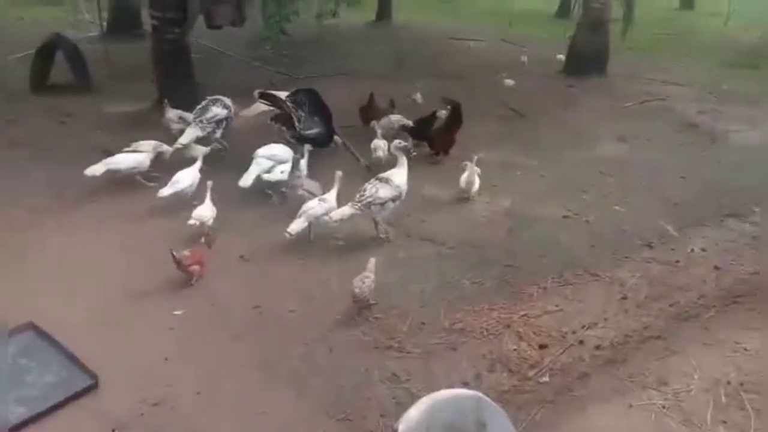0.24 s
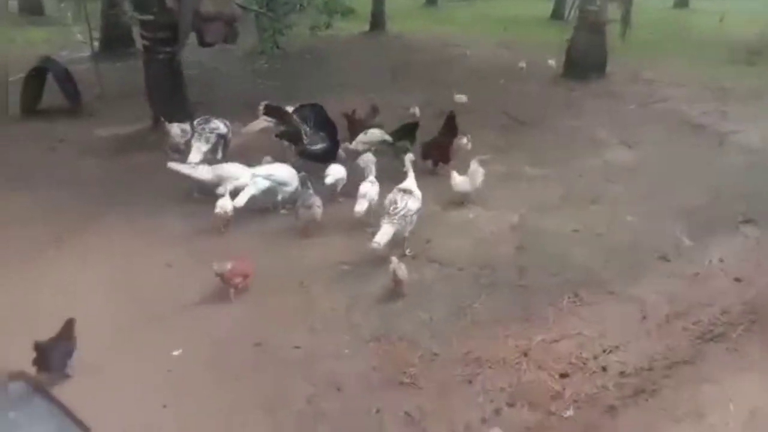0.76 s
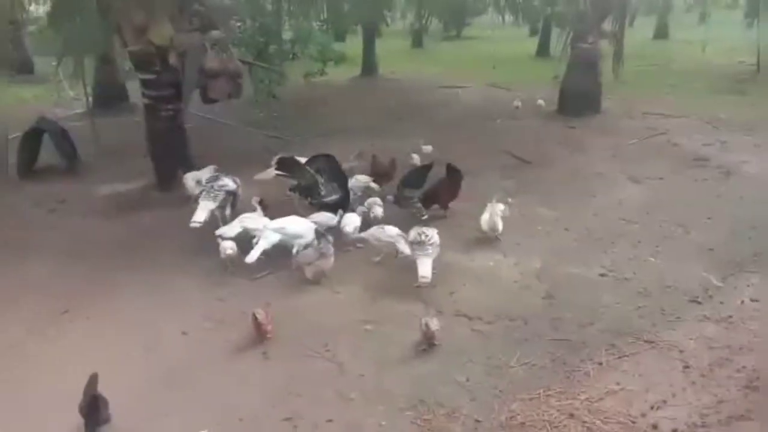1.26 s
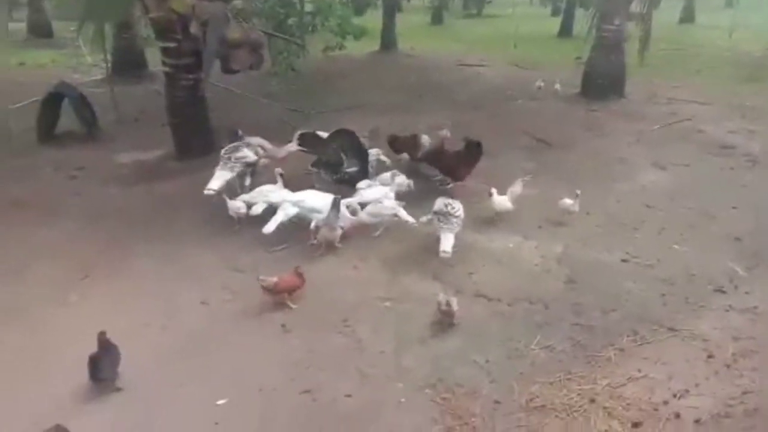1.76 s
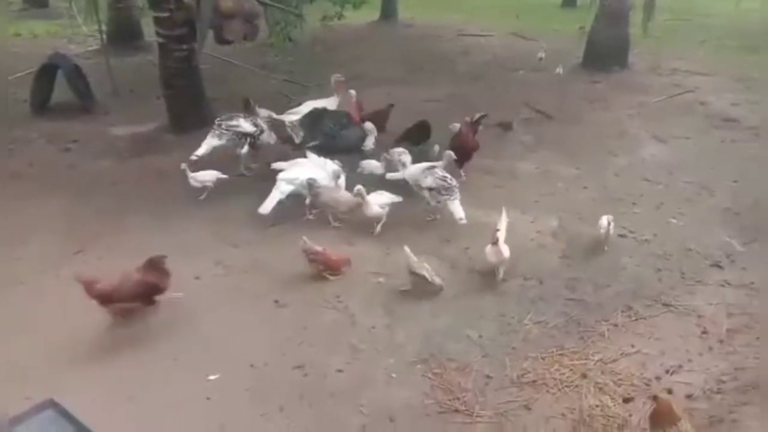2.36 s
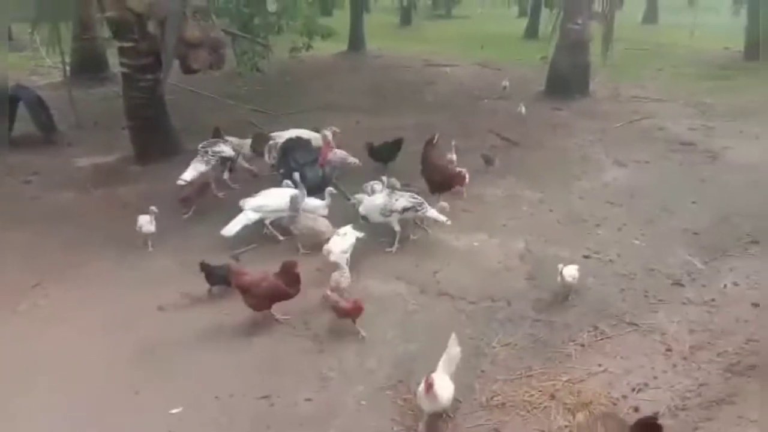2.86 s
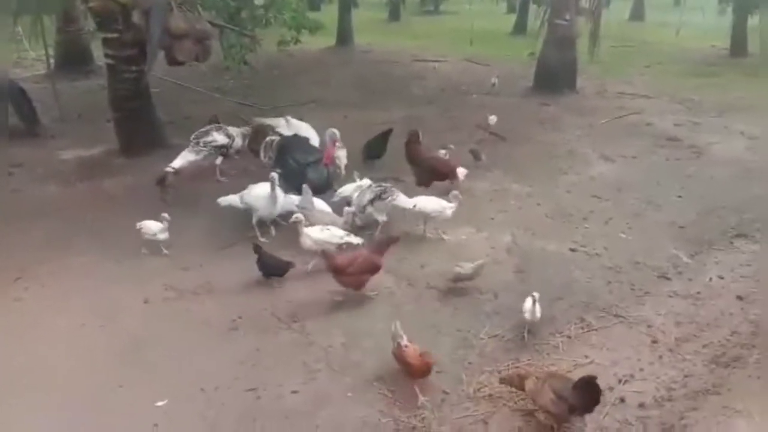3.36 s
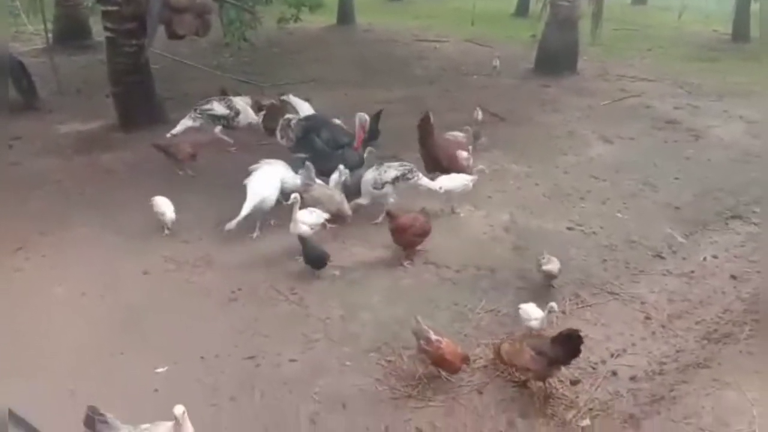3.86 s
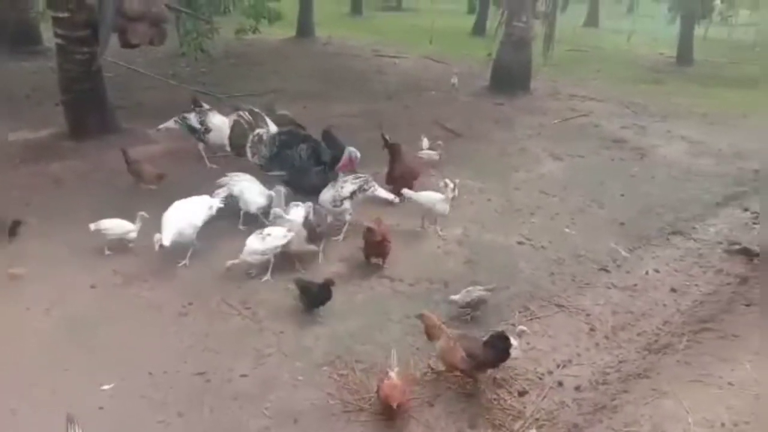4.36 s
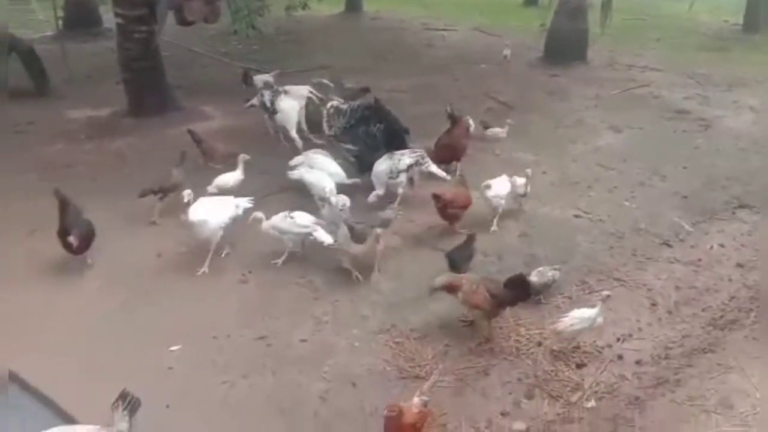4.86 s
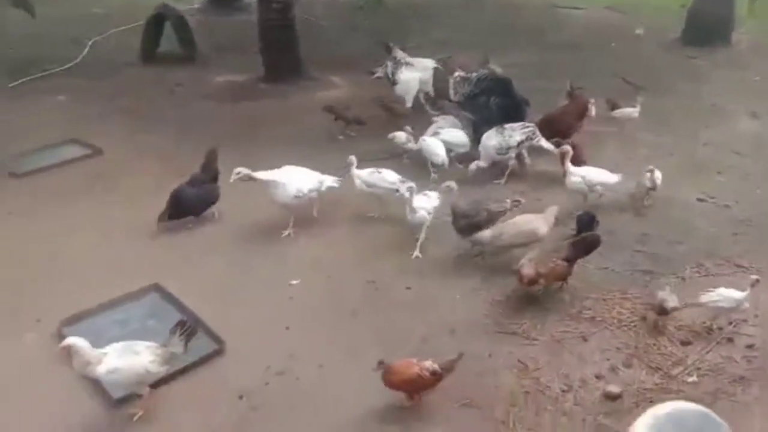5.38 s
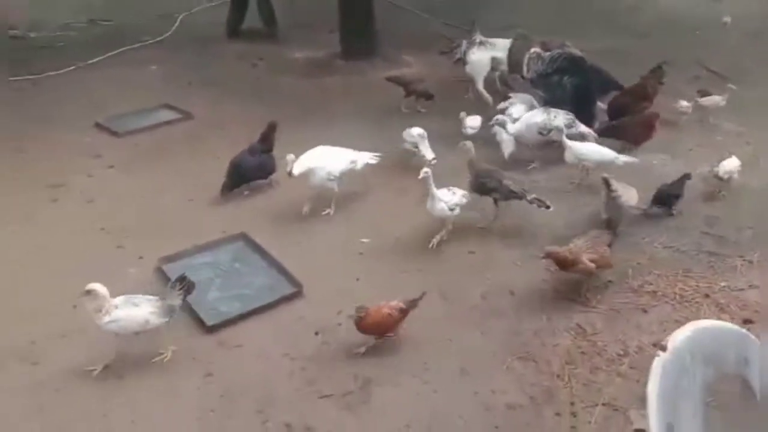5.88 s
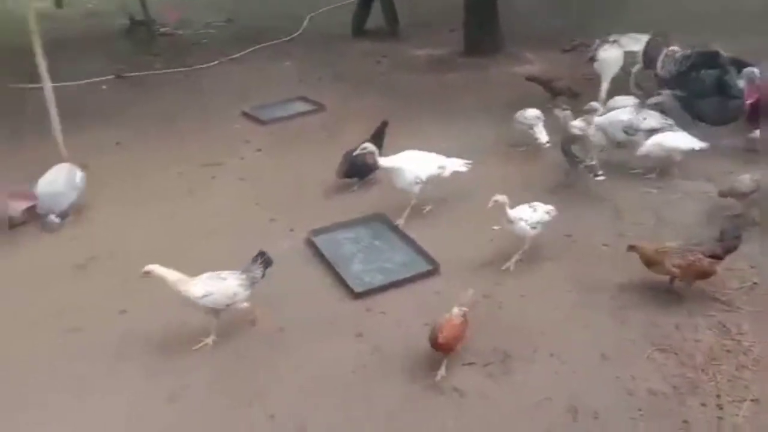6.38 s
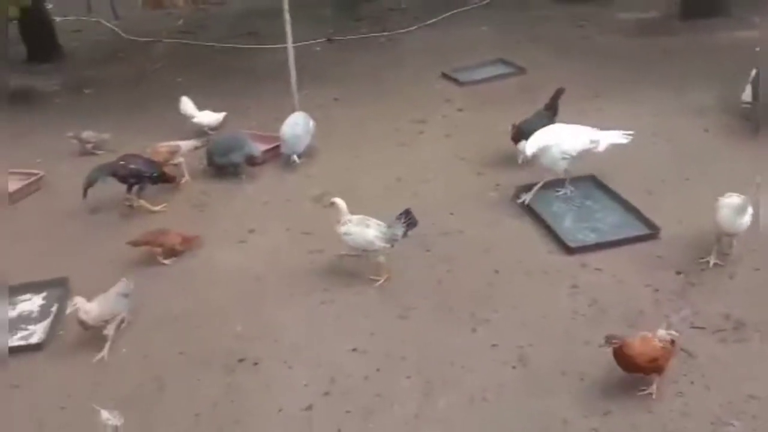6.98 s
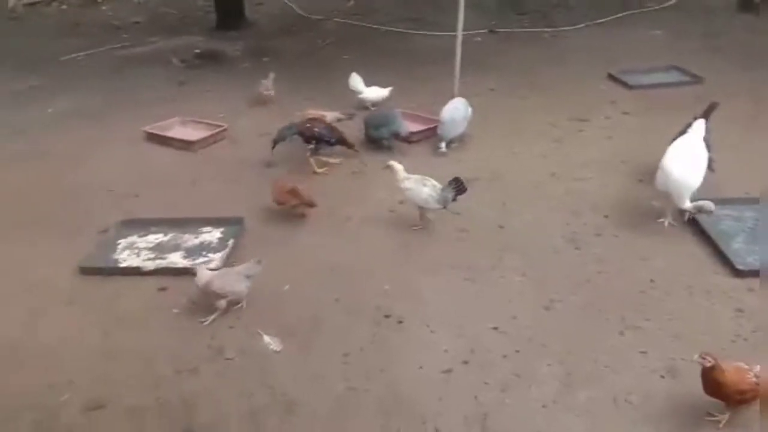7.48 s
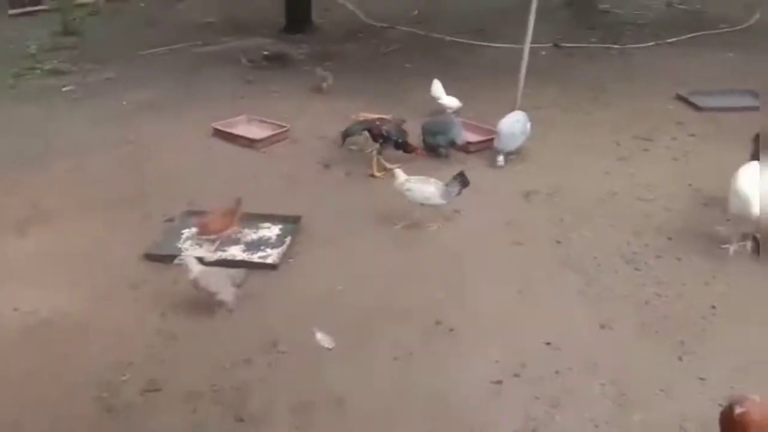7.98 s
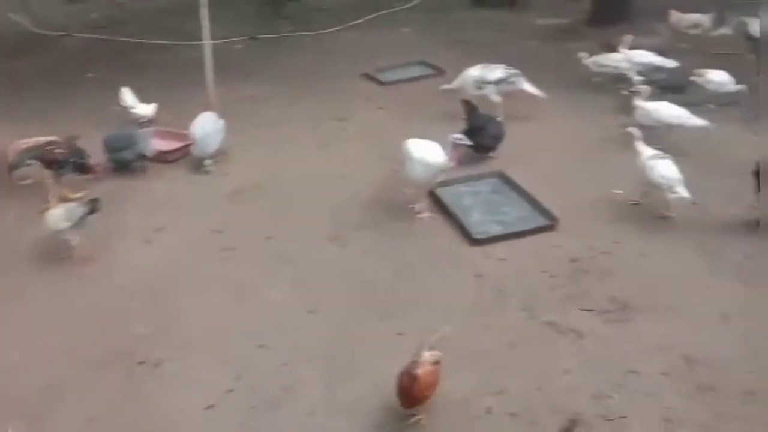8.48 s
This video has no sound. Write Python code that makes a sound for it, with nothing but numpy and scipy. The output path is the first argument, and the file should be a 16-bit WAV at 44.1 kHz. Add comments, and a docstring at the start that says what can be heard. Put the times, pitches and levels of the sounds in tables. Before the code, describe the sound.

A mixed flock of young turkeys and hens peeps, chirps and clucks in an open farm yard over steady high insect drone.

```python
"""A low hum swells briefly, perhaps a strutting tom's drumming, while a mixed flock feeds in a farm yard under trees.
Young turkeys peep and chirp in thin, gliding near-sines; hens cluck in pulses and gated air shaped by throat
resonances, and one draws out a long rising note. Insects drone in the trees throughout, as shaped noise over a
distant rumble; feet and wings scratch in grainy noise. Echoes off the yard smear the calls."""
import sys
import numpy as np
from scipy import signal
from scipy.fft import rfft, irfft, next_fast_len
from scipy.io import wavfile
from scipy.ndimage import map_coordinates

SR = 44100
rng = np.random.default_rng(int(sys.argv[2]) if len(sys.argv) > 2 else 0)


def put_to_file(sound):
    """Save the sound as 16-bit audio at rate SR, in the file named by the first command-line argument."""
    columns = np.atleast_2d(sound).T  # one column per channel
    safe = np.clip(columns, -1, 1)
    whole_steps = np.round(safe * 32767)
    wavfile.write(sys.argv[1], SR, whole_steps.astype(np.int16))


N = 384993

# Activity at the back of the flock. Each row: time in seconds, level in dB before each layer's own gain.
YARD_ACTIVITY = [(0, -27), (.78, -39), (1.29, -46.5), (1.6, -38.5), (2.04, -37.5), (2.19, -33.5),
                 (2.77, -40), (3.4, -40.5), (4.65, -36), (4.9, -40), (5.4, -43), (5.9, -45), (6.55, -53),
                 (7.3, -47), (7.8, -45.5), (7.98, -33), (8.15, -41), (8.73, -59)]


def from_db(db):
    """Decibels to gain."""
    return 10 ** (np.asarray(db) / 20)


def rms_one(x):
    """Scale to unit power."""
    return x / np.sqrt(np.mean(x ** 2) + 1e-20)


def in_time(rows):
    """Interpolate each column of a curve at every sample; the first column is seconds."""
    s, *columns = np.transpose(rows)
    t = np.arange(N) / SR
    return [np.interp(t, s, column) for column in columns]


def colour(x, spectrum):
    """Shape a signal by (Hz, dB) points, interpolated over log frequency."""
    hz, db = np.transpose(spectrum)
    bins_hz = np.maximum(np.fft.rfftfreq(len(x), 1 / SR), 1)
    gain = from_db(np.interp(np.log(bins_hz), np.log(hz), db))
    return irfft(rfft(x) * gain, len(x))


def noise(spectrum):
    """Coloured noise of unit power."""
    white = rng.standard_normal(next_fast_len(N))
    return rms_one(colour(white, spectrum)[:N])


def drift(rate_hz, size):
    """Smooth random wander of spread about 1, through `rate_hz` random knots a second."""
    knots = rng.standard_normal(4096)
    return map_coordinates(knots, [np.arange(size) * rate_hz / SR], order=2, mode="wrap")


def add(out, s, sound):
    """Mix a sound in at time s."""
    at = int(s * SR)
    out[at:at + len(sound)] += sound[:max(N - at, 0)]


def turn(hz):
    """Phase of a moving pitch."""
    return 2 * np.pi * np.cumsum(hz) / SR


def swell(length_s, loudest, fullness):
    """One push of air of unit power: rises to its loudest point (share of its length) and dies."""
    u = np.linspace(0, 1, int(length_s * SR))
    arch = np.sin(np.pi * np.interp(u, [0, loudest, 1], [0, .5, 1]))
    return rms_one(np.abs(arch) ** fullness)


def arc(hz, glide, arch=0):
    """Start, middle and end pitch of a note that glides and bows."""
    return hz * (1 + glide * np.array([-.5, 0, .5]) - arch * np.array([1, 0, 1]))


def hum(hum_hz=55.0, waver=0.008, unsteady=0.34, dulling=0.12):
    """A loose low tone swells and fades; each partial wanders on its own and the upper ones die first."""
    # Each row: time in seconds, level in dB.
    hum_level = [(0, -37), (.08, -36.5), (.27, -33), (.45, -37), (.56, -41.5), (.65, -37.5), (.8, -47.5),
                 (1.0, -49.5), (1.5, -51), (2.2, -52)]
    # Each row: multiple of hum_hz, relative level in dB.
    hum_partials = [(2, -1), (3, -11), (4, 1.5), (5, 0.5), (6, -6), (7, -7), (8, -2), (9, -7.5), (10, -10)]
    db, = in_time(hum_level)
    sunk_db = db - db.max()
    out = np.zeros(N)
    for k, partial_db in hum_partials:
        # dulling: extra dB lost per partial for each dB that the hum sinks
        gain = from_db(partial_db + dulling * (k - 0.5) * sunk_db)
        gain = gain * np.exp(unsteady * drift(11, N))
        phase = turn(k * hum_hz * (1 + waver * drift(30, N)))
        out += gain * np.sin(phase + rng.uniform(0, 2 * np.pi))
    power = np.sum(from_db([partial_db for k, partial_db in hum_partials]) ** 2) / 2
    return from_db(db) * out / np.sqrt(power)


def rumble(gain_db=-0.5, lump_db=2.0):
    """Distant rumble: low noise with a lumpy level."""
    # Each row: time in seconds, level in dB before gain_db.
    rumble_level = [(0, -42), (.8, -43), (1.5, -46), (3, -46.5), (4, -50.5), (5.1, -47.5), (6, -48),
                    (7.3, -51.5), (8.2, -49), (8.73, -56)]
    # Each row: frequency in Hz, relative density in dB per Hz.
    rumble_spectrum = [(20, -13), (40, -20), (65, 5), (110, 7.5), (180, 3.5), (260, -9.5), (400, -10),
                       (800, -12.5), (2000, -32)]
    db = in_time(rumble_level)[0] + gain_db + lump_db * drift(17, N)
    return from_db(db) * noise(rumble_spectrum)


def far_flock_blur(gain_db=-13.5, surge_db=4.0):
    """Far birds blur into shaped noise that surges with the yard's activity."""
    # Each row: frequency in Hz, relative density in dB per Hz.
    flock_spectrum = [(300, 6.5), (500, 9), (1000, 17), (1700, 17.5), (2700, 11), (3700, 16.5), (5200, 9.5),
                      (7000, -37), (13000, -45)]
    db = in_time(YARD_ACTIVITY)[0] + gain_db + surge_db * drift(18, N)
    return from_db(db) * noise(flock_spectrum)


def insects(level_db=-33.0, throb_db=1.28):
    """Insect chorus: throbbing high noise, spread in stereo through the trees by an independent side signal."""
    # Each row: frequency in Hz, relative density in dB per Hz.
    insect_spectrum = [(4500, -30), (5700, -19.5), (6400, -7), (7100, -2.5), (7850, 2), (8400, -2),
                       (8900, -5.5), (9300, -15), (10000, -21), (11000, -30.5), (13000, -40)]
    # Each row: frequency in Hz, side minus mid in dB.
    insect_width = [(4500, -27.5), (6000, -4), (7000, -2), (8000, -20.5), (9500, -4.5), (12000, -8)]
    mid = noise(insect_spectrum)
    side = colour(noise(insect_spectrum), insect_width)
    stereo = mid + side * np.array([[1], [-1]])
    return from_db(level_db + throb_db * drift(90, N)) * stereo


def scratches(grain_db=-1.0, top_db=-32, upper_db=-8):
    """Short grainy hisses with a steep lower edge, as of feet and wings brushing the ground."""
    # Each row: start in seconds, length in seconds, lower edge in Hz, level in dB.
    strokes = [(0.02, 0.16, 734, -42), (0.698, 0.037, 1310, -42), (6.623, 0.0095, 777, -36),
               (8.222, 0.47, 1380, -44)]
    out = np.zeros(N)
    for s, length_s, edge_hz, db in strokes:
        stroke = swell(length_s, .25, fullness=.35)
        n = len(stroke)
        grit = rng.standard_normal(n) * from_db(grain_db * drift(600, n))
        spectrum = [(edge_hz * 0.84, -25), (edge_hz, 0), (4300, upper_db), (12000, top_db)]
        add(out, s, from_db(db) * stroke * rms_one(colour(grit, spectrum)))
    return out


def whistle(length_s, arc_hz, loudest, partials_db, rough, scoop=0.0, waver=0.0032, rasp=0.041, flutter=0.41,
            rasp_rate_hz=420, trill_hz=135, fullness=0.5):
    """A near-sine from the syrinx on a pitch arc; when forced, its pitch and strength flutter."""
    push = swell(length_s, loudest, fullness)
    n = len(push)
    u = np.linspace(0, 1, n)
    hz = np.polyval(np.polyfit([0, .5, 1], arc_hz, 2), u)
    # pitch climbs into the note while the pressure builds
    hz = hz * (1 - scoop * np.exp(-u / 0.0927))
    phase = turn(hz * (1 + waver * drift(94.5, n) + rough * rasp * drift(rasp_rate_hz, n)))
    tone = sum(from_db(db) * np.sin(k * phase) for k, db in enumerate(partials_db, 1))
    # a forced note throbs in uneven beats
    beats = np.sin(turn(trill_hz * (1 + 0.28 * drift(60.0, n))))
    beats = beats + 2.16 * drift(rasp_rate_hz, n)
    return np.sqrt(2) * push * tone * (1 + rough * flutter * beats)


def peep(length_s, arc_hz, db, octave_db, rough, loudest=0.56, third_db=-12, fourth_db=-33, scoop=0.0323):
    """A young turkey's note: fundamental, octave and a trace of higher partials."""
    weaker_db = min(db, octave_db)
    partials_db = [db, octave_db, weaker_db + third_db, weaker_db + fourth_db]
    return whistle(length_s, arc_hz, loudest, partials_db, rough, scoop=scoop)


def scattered(sound, share, t60_s=0.13):
    """Part of a call's power goes round bodies and trunks and arrives blurred, with a short tail."""
    t = np.arange(int(.25 * SR)) / SR
    paths = rng.standard_normal(len(t)) * from_db(-60 * t / t60_s)
    paths *= np.sqrt(share / np.sum(paths ** 2))
    paths[0] = np.sqrt(1 - share)  # direct sound
    return signal.fftconvolve(sound, paths)


def held_peeps(strand_ratio=1.05, strand_share=0.11):
    """Poults' held peeps; in a hoarse one the other side of the syrinx beats against the first."""
    # Each row: start in seconds, length in seconds, pitch in Hz, glide and arch as shares of the pitch,
    # level in dB before the poults' gain, roughness 0-1, octave against the fundamental in dB.
    peep_notes = [(.025, .16, 2793, 0.035, 0.075, -42, 0.33, -18),
                  (.16, .14, 2188, 0.028, -0.01, -40.5, .08, -7),
                  (.329, 0.13, 2797, 0.055, -0.0028, -45.5, 0.2, -7),
                  (.49, 0.14, 2103, -0.15, -0.12, -45.5, 0.48, -18),
                  (.605, 0.13, 2751, 0.0021, -0.022, -39.5, 0.26, -10.5),
                  (.915, 0.15, 2900, -0.016, 0.073, -45.5, 0.41, -8),
                  (.95, 0.055, 2530, 0.078, 0, -55, .6, -20),
                  (1.243, 0.094, 2812, 0.024, -0.0076, -44.5, 0.24, -4.5),
                  (1.319, .059, 2997, 0.019, 0.034, -44, 0.26, -9),
                  (1.365, 0.1, 2640, 0, -.027, -55.5, 0.64, -5),
                  (1.519, .1, 2944, 0.11, 0.042, -44.5, .5, -8),
                  (1.565, 0.11, 2783, -0.013, 0.067, -41, 0.3, -7),
                  (1.616, 0.091, 1880, -0.11, -.063, -44.5, .39, -18),
                  (1.768, 0.084, 3073, -0.051, 0.012, -34, 0.2, -13),
                  (1.822, 0.14, 2770, 0.014, 0.0074, -34, 0.39, -10.5),
                  (2.067, .13, 2822, 0.058, -0.019, -31.5, 0.21, -12),
                  (2.359, .11, 2890, -0.093, 0.026, -27.5, 0.23, -13),
                  (2.543, 0.089, 2746, 0.14, 0.11, -32, 0.17, -18.5),
                  (2.643, 0.096, 2950, -0.086, -0.013, -26, 0.13, -13),
                  (2.948, .16, 3064, -0.025, 0.0033, -33.5, 0.021, -10.5),
                  (3.354, .12, 2560, -0.1, 0.014, -37.5, 0.18, -7),
                  (3.676, .12, 2467, -0.2, -0.07, -43.5, 0.19, -9),
                  (3.81, 0.054, 1900, 0.035, -0.0073, -46, 0.23, -4),
                  (3.875, 0.061, 1944, 0.029, -0.027, -33, 0.18, -14),
                  (3.991, 0.18, 2612, -0.0059, 0.041, -41, 0.2, -15),
                  (4.075, 0.066, 2142, 0.14, -0.055, -39, 0.38, -7.5),
                  (4.116, 0.086, 2734, -.083, -.03, -33.5, 0.58, -25),
                  (4.198, 0.066, 2484, -0.047, 0.012, -34.5, 0.3, -26),
                  (4.322, 0.063, 2706, -0.013, -0.011, -34.5, 0.23, -21),
                  (4.393, 0.071, 2732, 0.0029, 0.016, -30.5, 0.16, -18),
                  (4.43, 0.23, 2835, -0.019, .01, -38, 0.72, -22),
                  (4.44, 0.087, 2526, -0.019, -.015, -43, 0.16, 1),
                  (4.549, .059, 2606, -.08, -0.046, -38.5, .48, -17),
                  (4.668, 0.053, 2780, 0.037, 0.022, -31.5, 0.17, -23),
                  (4.7, 0.101, 2762, .03, 0, -30.5, 0.19, -22),
                  (4.79, 0.12, 2942, -0.073, 0.095, -26, 0.41, -25.5),
                  (5.045, 0.072, 3010, 0.07, 0.092, -28, 0.19, -24),
                  (5.099, 0.11, 2714, -0.043, 0.021, -34, 0.17, -17),
                  (5.385, 0.028, 2504, -0.17, -.094, -38.5, .25, -9),
                  (5.423, 0.041, 2787, 0.027, 0.085, -32, 0.39, -24),
                  (5.451, 0.06, 2506, -0.18, -0.02, -32.5, 0.27, -20),
                  (5.86, 0.084, 2386, -0.17, 0.002, -38.5, 0.65, -21),
                  (6.465, 0.043, 2730, 0.12, 0.018, -49, .3, -20),
                  (7.075, 0.05, 2980, 0.031, 0.14, -43.5, 0.59, -8),
                  (7.23, 0.073, 2777, -.024, .024, -50, 0.23, -17),
                  (7.314, 0.1, 2373, 0.022, -.044, -39, .2, -5.5),
                  (7.42, 0.018, 3000, .095, .035, -45, .4, -17),
                  (7.495, 0.12, 3290, -.27, -0.0013, -45.5, 0.17, -20),
                  (7.63, 0.089, 2602, -.14, 0.0057, -40, 0.38, -18),
                  (7.7, 0.082, 2840, 0.11, 0.088, -45, 0.49, -8.5),
                  (7.9, .07, 2240, -0.122, 0.0034, -41.5, 0.42, -25),
                  (7.959, .12, 2930, -0.0087, 0, -49, 0.63, -18),
                  (8.1, 0.21, 3110, 0.016, -0.0099, -51, 0.63, -20)]
    # A quiet, distant bird arrives more scattered. Each row: level in dB, scattered share of the power.
    peep_scatter = [(-44, 0.34), (-39.5, 0.015)]
    out = np.zeros(N)
    for s, length_s, hz, glide, arch, db, rough, octave_db in peep_notes:
        note = peep(length_s, arc(hz, glide, arch), db, db + octave_db, rough)
        strand = whistle(length_s, arc(strand_ratio * hz, glide), 0.52, [db], rough)
        share = np.interp(db, *np.transpose(peep_scatter))
        add(out, s, scattered(note + strand_share * rough * strand, share))
    return out


def yelps(fundamental_db=-10, rough=0.33, loudest=0.66):
    """Poults' yelps slide down and sound mostly in their octave."""
    # Each row: start in seconds, length in seconds, pitch in Hz, glide as a share of the pitch,
    # octave level in dB before the poults' gain.
    yelp_notes = [(1.62, 0.072, 2264, -0.27, -48.5), (1.666, 0.058, 1985, -0.025, -43.5),
                  (1.856, 0.092, 2143, -0.2, -35.5), (2.202, 0.092, 2060, -0.29, -40.5),
                  (2.728, .11, 2505, -0.087, -43.5), (3.062, 0.093, 2470, -0.16, -38),
                  (5.491, 0.042, 1880, -0.071, -45.5), (7.913, 0.079, 2065, -0.21, -33),
                  (8.185, 0.092, 2040, -0.258, -34), (8.669, 0.051, 2142, -0.099, -36)]
    out = np.zeros(N)
    for s, length_s, hz, glide, octave_db in yelp_notes:
        add(out, s, peep(length_s, arc(hz, glide), octave_db + fundamental_db, octave_db, rough, loudest))
    return out


def climbing_whistles(length_s=0.1326, glide=0.004, arch=0.011, rough=0.058, scoop=0.083, loudest=0.73):
    """Poults' whistles climb to a held pitch, mostly strongest in the octave."""
    # Each row: start in seconds, pitch in Hz, octave and fundamental levels in dB before the poults' gain.
    whistle_notes = [(3.07, 2110, -41, -74), (6.04, 2187, -50.5, -48), (6.346, 2345, -38.5, -48.5),
                     (6.648, 2323, -41, -42), (6.949, 2420, -39, -46.5)]
    out = np.zeros(N)
    for s, hz, octave_db, db in whistle_notes:
        add(out, s, peep(length_s, arc(hz, glide, arch), db, octave_db, rough, loudest, scoop=scoop))
    return out


def poults(gain_db=3.5):
    """Young turkeys: peeps, yelps and whistles from the syrinx under one gain."""
    return from_db(gain_db) * (held_peeps() + yelps() + climbing_whistles())


def chirps(gain_db=-2, loudest=0.33, arch=0.038, octave_db=-24, rough=0.23, twin_ratio=1.09, twin_db=-13):
    """Quick slides in which both sides of the syrinx sound."""
    # Each row: start in seconds, length in seconds, pitch in Hz, glide as a share of the pitch,
    # level in dB before gain_db.
    chirp_notes = [(0.127, 0.026, 3300, 0.01, -42), (0.735, 0.041, 2690, -0.47, -41),
                   (1.444, 0.046, 2290, -.35, -40), (1.598, 0.087, 2486, -0.26, -38),
                   (1.678, 0.042, 2116, 0.16, -37), (1.873, 0.035, 3190, 0.05, -37),
                   (2.075, 0.02, 2330, -0.41, -47), (2.137, .062, 2618, -0.27, -25.5),
                   (2.164, 0.058, 2910, 0.24, -26.5), (2.354, 0.038, 2050, -0.83, -34.5),
                   (2.44, 0.063, 3013, 0.16, -28), (2.6, 0.061, 2370, -0.57, -35),
                   (2.729, 0.041, 3194, 0.25, -23.5), (2.73, 0.034, 2420, -0.35, -35),
                   (2.785, 0.044, 2560, -.6, -34), (3.178, 0.036, 2950, -0.68, -24),
                   (4.887, 0.05, 2520, -0.18, -36.5), (5.16, .025, 2330, -.25, -52),
                   (5.217, 0.033, 2210, -0.19, -39), (5.352, 0.083, 2730, -1, -36.5),
                   (5.803, 0.0346, 2520, -0.25, -44.5), (6.295, 0.038, 2655, -0.14, -42),
                   (6.564, 0.046, 2420, -0.5, -45), (7.299, 0.052, 2520, 0.013, -39),
                   (7.365, 0.085, 2570, -0.63, -46), (7.612, 0.055, 2415, -0.41, -41.5)]
    out = np.zeros(N)
    for s, length_s, hz, glide, db in chirp_notes:
        main = whistle(length_s, arc(hz, glide, arch), loudest, [db, db + octave_db], rough)
        twin = whistle(length_s, arc(twin_ratio * hz, glide, arch), loudest, [db + twin_db], rough)
        add(out, s, from_db(gain_db) * (main + twin))
    return out


def whines(loudest=0.41, octave_db=-14, third_db=-19, rough=0.26):
    """Older birds whine below the pitch of the young, with an octave and a third partial."""
    # Each row: start in seconds, length in seconds, pitch in Hz, glide as a share of the pitch, level in dB.
    whine_notes = [(0.243, 0.19, 1153, 0.14, -44), (0.41, 0.027, 1058, -0.5, -35.5),
                   (.425, 0.044, 1333, -0.13, -43), (0.476, 0.059, 1033, -0.23, -40.5),
                   (1.76, 0.13, 1217, -0.16, -36), (1.875, 0.11, 987, 0.037, -33),
                   (2.101, 0.038, 1635, 0.13, -33), (3.271, 0.12, 824, -0.35, -49.5),
                   (3.473, 0.084, 1150, -0.38, -46), (4.428, 0.043, 1116, -0.24, -47.5),
                   (4.497, 0.094, 1018, -0.45, -42.5), (4.689, 0.02, 1403, -0.65, -40),
                   (4.604, 0.08, 702, -0.2, -52), (4.801, 0.045, 1180, -0.14, -38),
                   (4.843, 0.026, 880, -0.34, -41), (6.011, 0.16, 1106, 0.046, -44.5),
                   (6.01, 0.15, 1298, -0.074, -44), (7.137, 0.04, 1353, -0.045, -32.5),
                   (7.448, 0.15, 1477, 0.2, -45), (8.1, .12, 1534, 0.077, -50.5),
                   (8.298, 0.075, 1665, -0.03, -46.5)]
    out = np.zeros(N)
    for s, length_s, hz, glide, db in whine_notes:
        partials_db = [db, db + octave_db, db + third_db]
        add(out, s, whistle(length_s, arc(hz, glide), loudest, partials_db, rough))
    return out


def slurs(bend=2.2, loudest=0.42, octave_db=-26, rough=0.18):
    """Single clean notes hang on their top pitch, then drop ever faster."""
    # Each row: start in seconds, length in seconds, top pitch in Hz, fall as a share of the pitch, level in dB.
    slur_notes = [(0.41, 0.065, 3720, 0.23, -55), (3.492, 0.11, 3580, 0.64, -45),
                  (3.815, 0.11, 3830, .01, -48), (3.847, 0.14, 3530, 0.49, -42),
                  (5.003, 0.065, 3960, 0.31, -50), (5.114, 0.086, 3760, 0.21, -41.5),
                  (5.321, 0.051, 3990, 0.18, -45), (5.384, 0.09, 3540, 0.13, -40.5),
                  (5.755, .075, 3980, .3, -55), (5.875, 0.062, 3530, 0.144, -37.5),
                  (6.096, 0.11, 3580, 0.3, -35.5), (6.46, 0.1, 3670, 0.22, -42),
                  (6.672, 0.087, 3620, 0.35, -49), (6.716, 0.099, 3610, 0.37, -36),
                  (7.115, 0.067, 3660, 0.037, -45), (7.284, 0.07, 3470, 0.11, -48),
                  (7.443, 0.067, 4500, 0.28, -46), (7.825, 0.115, 3525, 0.36, -44.5),
                  (7.88, .05, 4000, .15, -49), (8.445, 0.12, 3350, 0.23, -45)]
    out = np.zeros(N)
    for s, length_s, top_hz, fall, db in slur_notes:
        arc_hz = top_hz * (1 - fall * np.array([0, .5, 1]) ** bend)
        add(out, s, whistle(length_s, arc_hz, loudest, [db, db + octave_db], rough))
    return out


def cluck(length_s, hz, throat_hz, rough, jitter=0.0554, breath=1.0, shimmer=0.72, rattle=0.96, rattle_hz=94.5,
          arch=0.101, loudest=0.223, bass_db=-38, low_db=-20, below_db=-11, skirt_db=-5, skirt=1.14,
          above_db=-13, top_db=-42, chest_hz=496, chest_db=3):
    """Uneven pulses and air gated by each cycle pass through the throat and chest resonances."""
    # Clear squawks rise, rough clucks fall. Each row: roughness, glide as a share of the pitch.
    cluck_glides = [(.3, 0.19), (.42, -.07), (.8, -.25)]
    # A low cluck is made with the beak shut, which muffles its top. Each row: throat resonance in Hz, muffling in dB.
    beak_muffle = [(600, -8), (900, -3)]
    push = swell(length_s, loudest, fullness=0.64)
    n = len(push)
    glide = np.interp(rough, *np.transpose(cluck_glides))
    # pitch rises with the pressure and stumbles when the voice is rough
    bend = glide * np.linspace(-.5, .5, n) + arch * (push - 1)
    phase = turn(hz * (1 + bend + rough * jitter * drift(302.2, n)))
    lags = rng.uniform(0, np.pi, 12)
    pulses = rms_one(sum(np.cos(k * phase + lag) for k, lag in enumerate(lags, 1)))
    air = rng.standard_normal(n) * (1 + np.cos(phase))
    # a rough voice closes and opens at about rattle_hz
    rattling = np.sin(turn(rattle_hz * (1 + 0.264 * drift(61.5, n))))
    grain = shimmer * drift(159.0, n) + rattle * rattling
    voice = (pulses + breath * rough * air) * (1 + rough * grain)
    muffle_db = np.interp(throat_hz, *np.transpose(beak_muffle))
    throat = [(130, bass_db), (220, low_db), (throat_hz / 2, below_db), (throat_hz / skirt, skirt_db),
              (throat_hz, 0), (throat_hz * skirt, skirt_db), (throat_hz * 2, above_db + muffle_db),
              (6000, top_db + muffle_db)]
    chest = [(chest_hz / skirt, 0), (chest_hz, chest_db), (chest_hz * skirt, 0)]
    return rms_one(push * colour(colour(voice, throat), chest))


def clucks():
    """The near hens cluck and squawk in throat-shaped pulses."""
    # Each row: start in seconds, length in seconds, pitch in Hz, throat resonance in Hz, level in dB, roughness.
    cluck_notes = [(0.418, 0.12, 579, 1010, -42, 0.59), (1.083, 0.062, 346, 490, -41.5, 0.58),
                   (2.13, 0.076, 388.6, 775, -44.5, 1.03), (2.374, 0.039, 530, 1550, -39.5, 0.76),
                   (2.491, 0.055, 432.5, 1040, -43.5, 1.08), (2.638, 0.4, 498, 1030, -46.5, 0.98),
                   (2.85, 0.11, 276, 905, -41.5, 0.54), (3.953, 0.02, 307, 990, -37, 0.8),
                   (4.275, 0.13, 281, 1010, -47, 0.39), (4.559, 0.063, 514, 950, -40, 0.63),
                   (4.617, 0.037, 326, 690, -43, 0.77), (4.712, 0.021, 375, 910, -34, 0.73),
                   (4.822, 0.02, 826, 1500, -31.5, 0.62), (4.86, 0.018, 401, 1120, -45, 0.7),
                   (5.015, 0.052, 337.6, 1090, -39, 0.38), (5.128, 0.051, 282, 1000, -43.5, 0.4),
                   (5.309, 0.085, 271.4, 920, -42.5, 0.7), (5.378, 0.068, 447, 744, -41.5, 0.1),
                   (5.45, 0.089, 520, 1120, -41.5, 0.36), (5.662, 0.046, 261.5, 750, -43, 0.79),
                   (5.759, 0.12, 369, 1320, -54.5, 0.37), (5.928, 0.2, 391, 1080, -42, 0.42),
                   (6.075, 0.092, 280, 640, -50, 0.4), (6.827, 0.027, 235.5, 1070, -39, 0.85),
                   (7.044, 0.049, 315.7, 1007, -40.5, 1.6), (7.333, 0.044, 265, 835, -44, 0.9),
                   (7.466, 0.19, 494, 1220, -45.5, 1), (7.723, 0.17, 202, 442, -51.5, 0.39),
                   (7.667, 0.45, 308, 1350, -48, 0.55), (7.94, 0.038, 357, 560, -43.5, 0.44),
                   (8.015, 0.23, 329, 1290, -49, 0.68), (8.135, 0.031, 284, 534, -43, 0.46),
                   (8.22, 0.0296, 207.6, 960, -40, 1.1)]
    out = np.zeros(N)
    for s, length_s, hz, throat_hz, db, rough in cluck_notes:
        add(out, s, from_db(db) * cluck(length_s, hz, throat_hz, rough))
    return out


def far_birds(count=120, start_s=1.3, end_s=7.6, level_db=-14, low_hz=1700, high_hz=3400, fall=0.199,
              octave_db=-9, rough=0.51, blur=0.86):
    """Birds at the back slip in soft, hoarse falling peeps, mostly scattered, that follow the yard's activity."""
    out = np.zeros(N)
    for k, (when, long, pitch, slide, loud) in enumerate(rng.random((count, 5))):
        hz = low_hz + (high_hz - low_hz) * pitch
        arc_hz = hz * (1 + fall * slide * np.array([.5, .1, -.5]))
        db = level_db + 3 * (2 * loud - 1)
        s = start_s + (end_s - start_s) * (k + when) / count
        add(out, s, whistle(0.031 + 0.13 * long, arc_hz, 0.05, [db, db + octave_db], rough))
    return scattered(out * from_db(in_time(YARD_ACTIVITY)[0]), blur)[:N]


def soft_clucks(count=14, start_s=2.3, end_s=8.1, length_s=0.1027, level_db=-52, hz=360, throat_hz=900,
                spread=0.54, rough=0.42):
    """Hens farther off mutter while they feed: soft clucks of random length, pitch and throat."""
    out = np.zeros(N)
    for k, (when, *chance) in enumerate(rng.random((count, 4))):
        long, pitch, throat = 1 + spread * (np.array(chance) - .5)
        s = start_s + (end_s - start_s) * (k + when) / count
        add(out, s, cluck(length_s * long, hz * pitch, throat_hz * throat, rough))
    return from_db(level_db) * out


def long_note(octave_rest_db=-48, push_octave_db=10, push_sag=0.074, upper_db=-21, waver=0.008, shimmer=0.034,
              quaver=0.0235, breakup=0.66, fullness=0.42):
    """A hen's slowly rising note sags with each push, and quavers and breaks up towards its end."""
    # Each row: time in seconds, pitch in Hz, fundamental level in dB.
    note_curve = [(6.077, 736, -48), (6.329, 827, -44.5), (6.72, 874.5, -40), (6.932, 888, -41),
                  (7.08, 975, -42), (7.3, 1047, -48), (7.48, 1003, -51)]
    # Pushes flatten the pitch and bring out the octave. Each row: start in seconds, length in seconds.
    pushes = [(6.386, 0.088), (6.469, 0.11), (6.556, 0.15), (6.726, .1), (6.931, 0.1), (7.189, 0.14),
              (7.365, 0.039), (7.41, 0.057)]
    hz, first_db = in_time(note_curve)
    start, end = note_curve[0][0], note_curve[-1][0]
    gate, strain = in_time([(start - .01, 0, 0), (start + 0.022, 1, 0), (end - .02, 1, 1), (end + .01, 0, 1)])
    effort = np.zeros(N)
    for s, length_s in pushes:
        push = swell(length_s, 0.42, fullness)
        add(effort, s, push / push.max())
    wander = waver * drift(120, N) + quaver * strain ** 2 * drift(45, N)
    phase = turn(hz * (1 - push_sag * effort + wander))
    octave_db = octave_rest_db + push_octave_db * effort
    partials_db = [first_db, octave_db, octave_db + upper_db, octave_db + upper_db]
    tone = sum(from_db(db) * np.sin(k * phase) for k, db in enumerate(partials_db, 1))
    strength = 1 + shimmer * drift(190, N) + breakup * strain ** 4 * drift(110, N)
    return np.sqrt(2) * gate * tone * strength


def yard_echo(x, gap_s=.008, scatter=0.72, t60_s=0.28, echo_db=-15.5, tail_db=-3):
    """Ground, trunks and walls scatter the calls: a faint allpass smear and a decaying noise tail."""
    # Scattering paths between ground, trunks and birds: delays in seconds.
    paths_s = [.0047, .0073, .0113, .0179]
    size = next_fast_len(N + SR)
    w = -2j * np.pi * np.fft.rfftfreq(size, 1 / SR)
    smear = np.exp(w * gap_s)
    for delay in np.exp(np.outer(paths_s, w)):
        smear = smear * (delay - scatter) / (1 - scatter * delay)
    t = np.arange(SR) / SR
    tail = rng.standard_normal(SR) * from_db(-60 * t / t60_s) * np.clip(t / 0.0016, 0, 1)
    tail /= np.sqrt(np.sum(tail ** 2))
    response = from_db(echo_db) * smear + from_db(tail_db) * rfft(tail, size)
    return irfft(rfft(x, size) * response, size)[:N]


def scene():
    """The flock in front, its echo and the yard around it."""
    young = poults() + chirps()
    hens = clucks() + soft_clucks() + long_note()
    flock = scratches() + young + whines() + slurs() + hens + far_birds()
    yard = rumble() + far_flock_blur() + insects()
    return flock + yard_echo(flock) + hum() + yard


def record(dry, cutoff_hz=13100):
    """The top is cut steeply by an elliptic low-pass."""
    return signal.sosfilt(signal.ellip(12, .1, 80, cutoff_hz, fs=SR, output="sos"), dry)


dry = scene()
out = record(dry)
put_to_file(out)
```